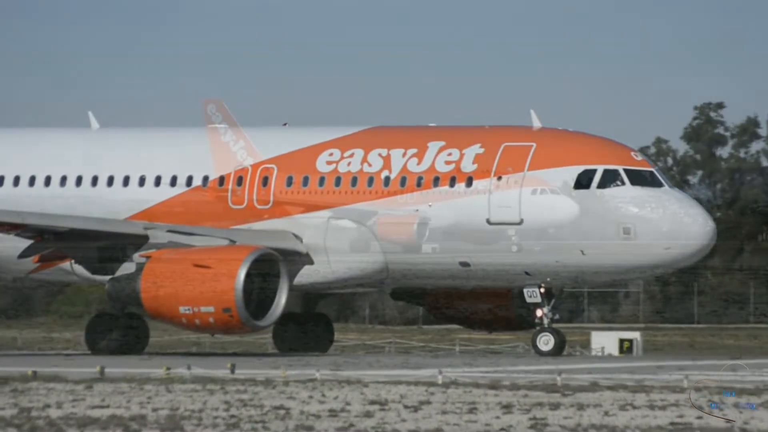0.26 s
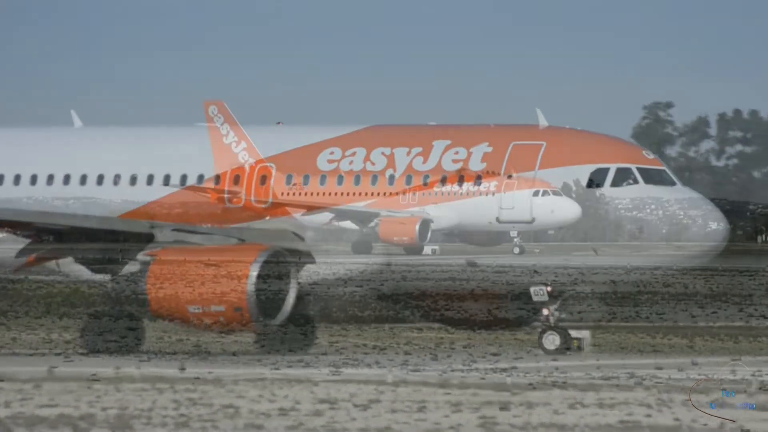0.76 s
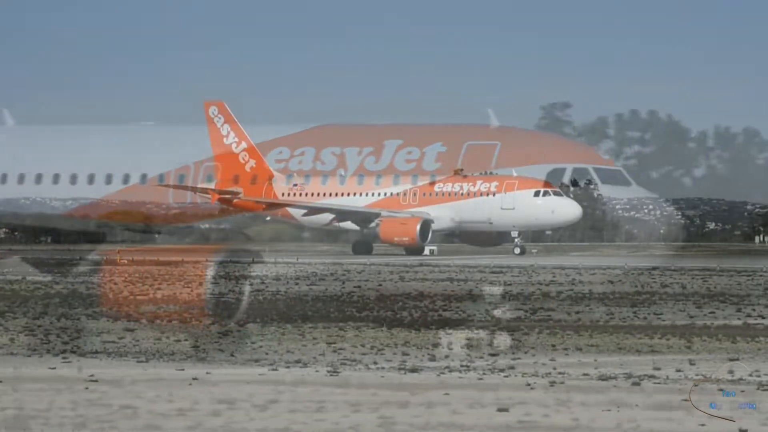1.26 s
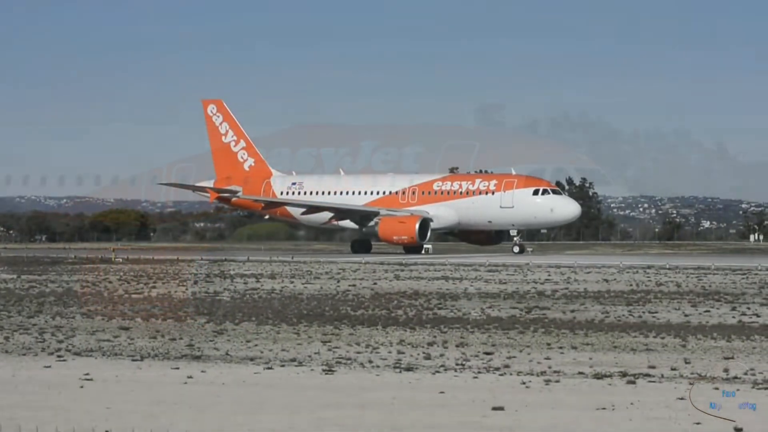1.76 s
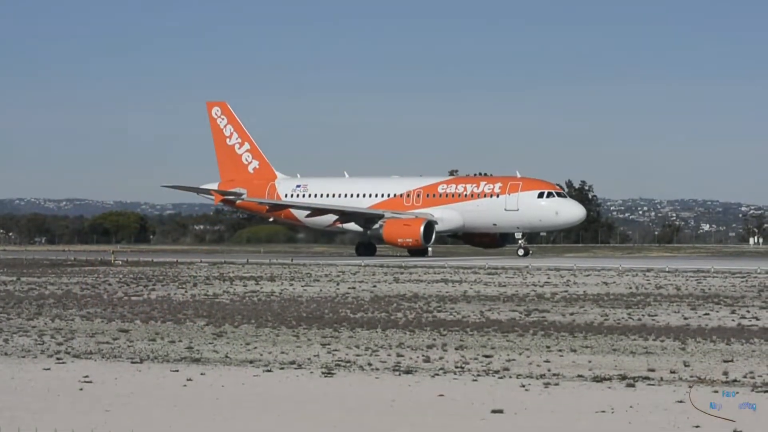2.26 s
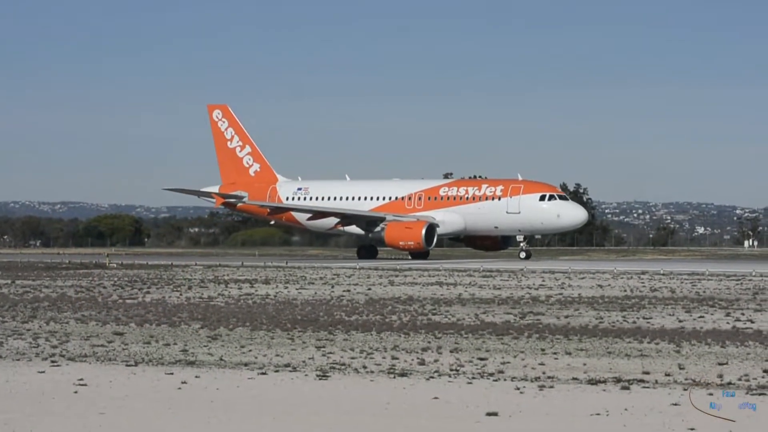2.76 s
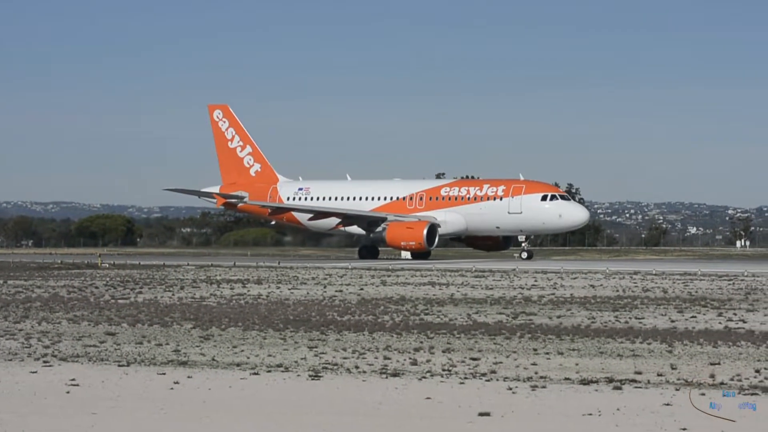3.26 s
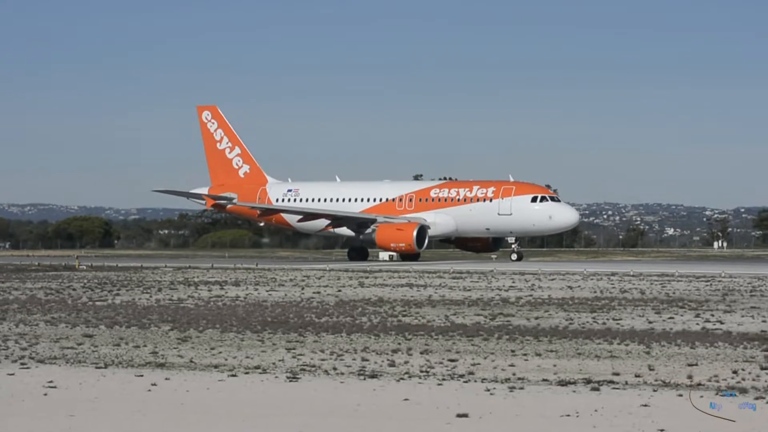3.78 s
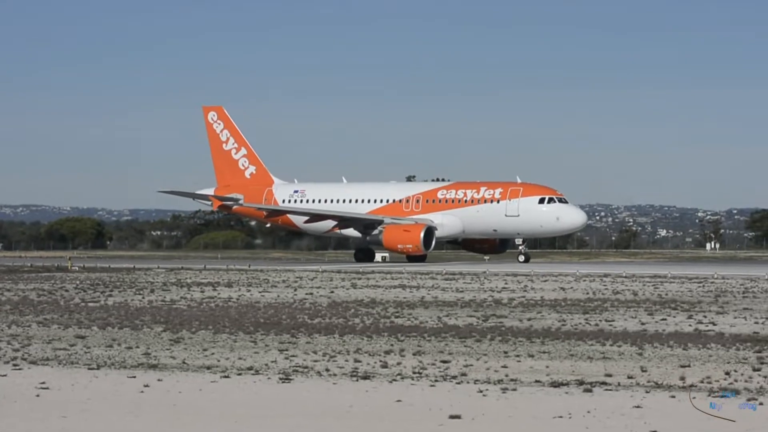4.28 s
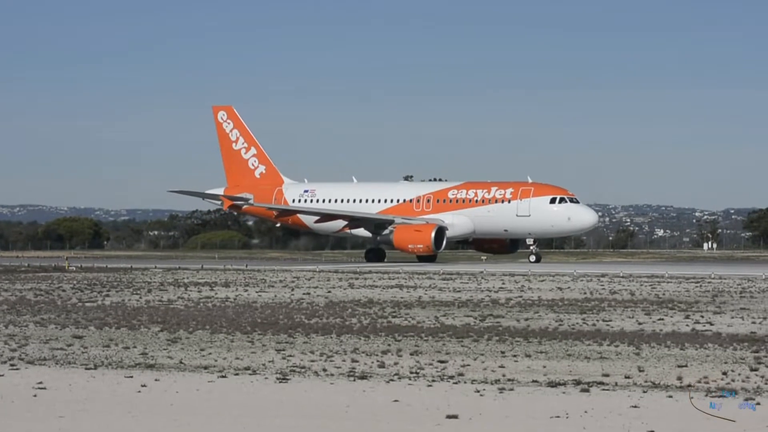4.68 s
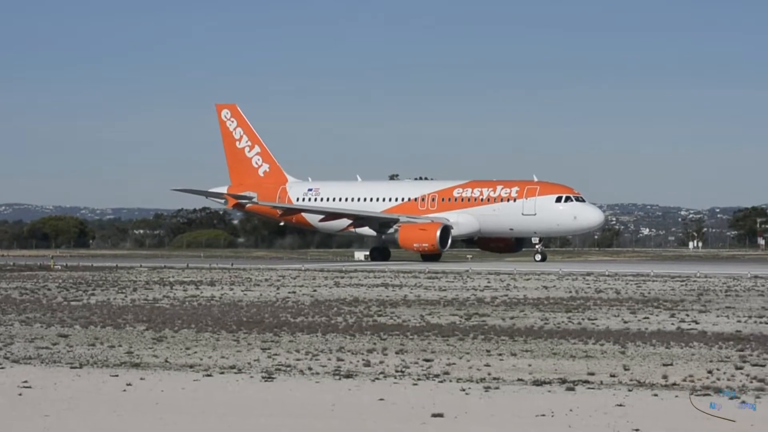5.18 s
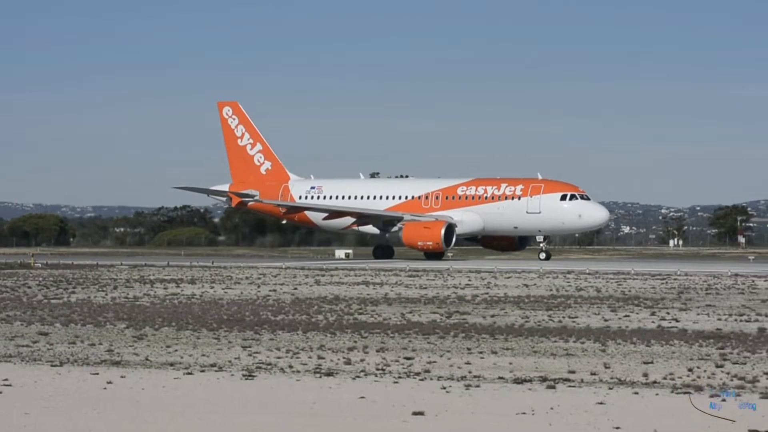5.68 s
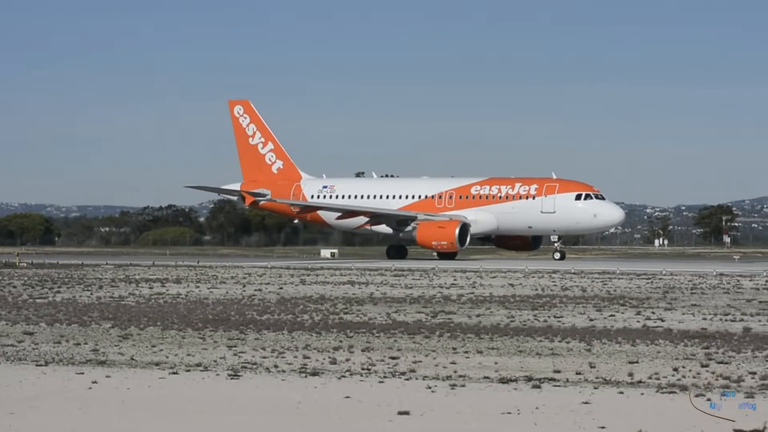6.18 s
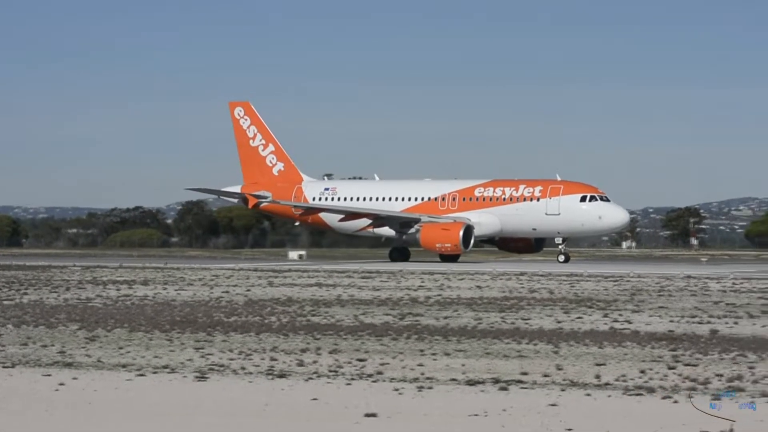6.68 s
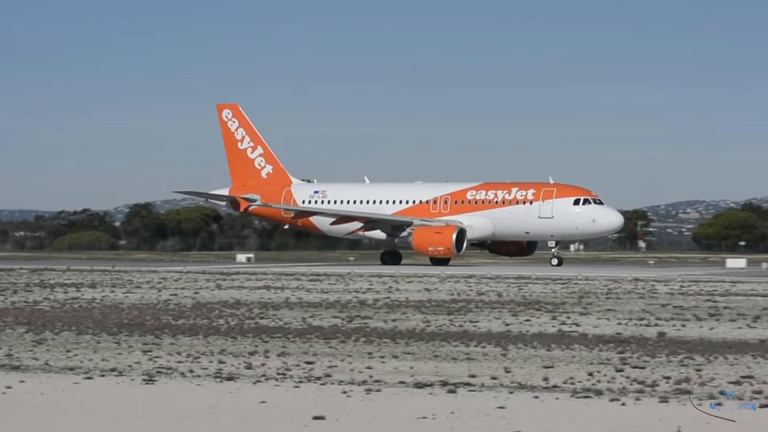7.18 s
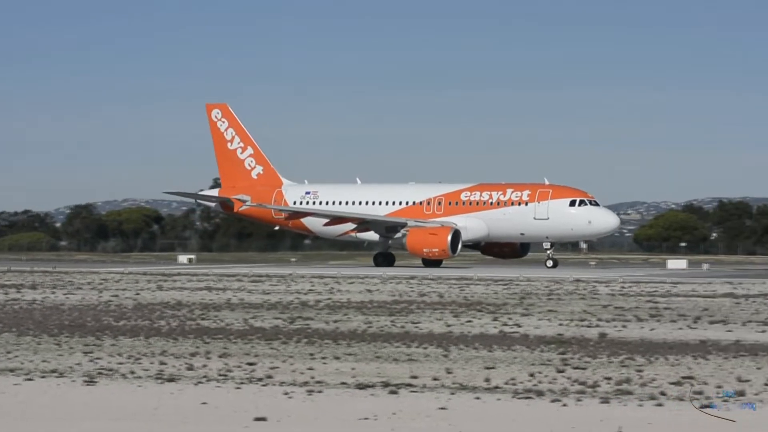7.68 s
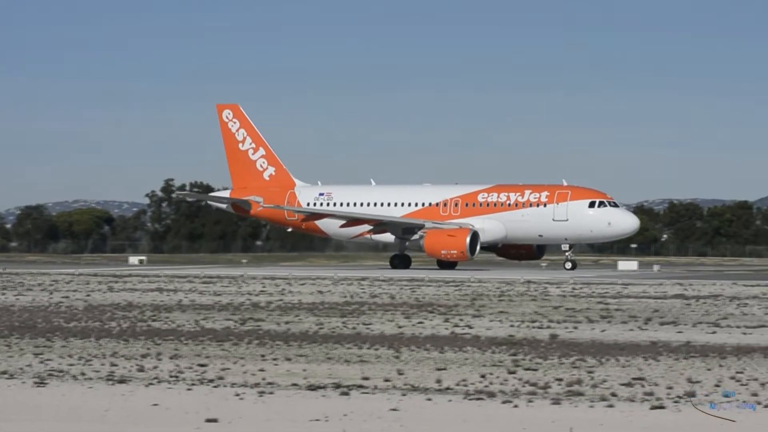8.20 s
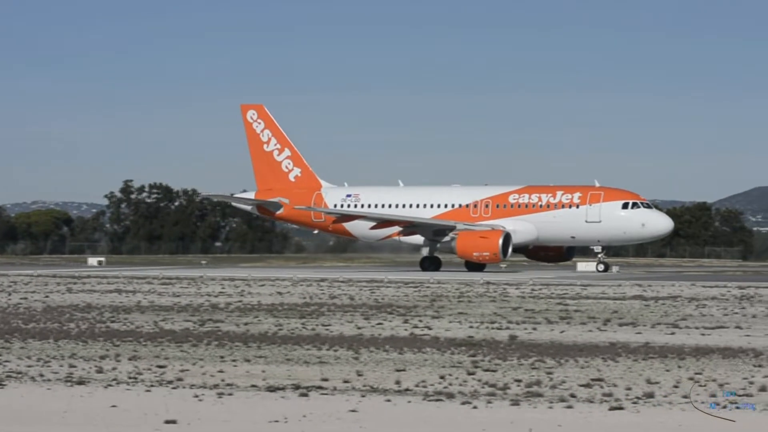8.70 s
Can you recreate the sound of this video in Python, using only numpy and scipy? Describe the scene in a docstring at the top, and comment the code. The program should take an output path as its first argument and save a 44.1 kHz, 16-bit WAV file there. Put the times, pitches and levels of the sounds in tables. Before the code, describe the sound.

Jet engines whine, rise in pitch, pause, then climb to a buzzing take-off roar as wind gusts rumble.

```python
"""On a runway, a twin-engined airliner spools up to half thrust, then to take-off thrust, and starts to roll.
Fan and compressor tones are multiples of shaft speed; they climb with it and flutter in the turbulent air.
Intake hiss and exhaust roar swell underneath, the combustors drone, and wind rumbles on the microphone.
Past half thrust a hollow howl stands out, and near full speed the supersonic fan tips add a buzz."""
import sys
import numpy as np
from scipy import signal
from scipy.fft import rfft, irfft, next_fast_len
from scipy.io import wavfile
from scipy.ndimage import uniform_filter1d

SR = 44100
rng = np.random.default_rng(int(sys.argv[2]) if len(sys.argv) > 2 else 0)


def digitize_waveform(pressure):
    """Quantize a signal to 16-bit integers and store it at the path in sys.argv[1].

    Rows of a 2-D input are taken as channels; values are limited to [-1, 1].
    """
    field = np.atleast_2d(pressure).T
    bounded = np.clip(field, -1, 1)
    quanta = np.round(bounded * 32767).astype(np.int16)
    wavfile.write(sys.argv[1], SR, quanta)


N = 394254
TIME = np.arange(N) / SR
ROLL_START_S, ROLL_DB_PER_S = 6.5, 2.5
# directivity: heard more from the side as the aircraft rolls, the rumble and the fan's octave grow
ROLL_DB = ROLL_DB_PER_S * np.maximum(TIME - ROLL_START_S, 0)


def from_db(db):
    """Amplitude grows tenfold for every 20 dB."""
    return 10 ** (np.asarray(db) / 20)


def rms_one(x):
    """Normalisation to unit power."""
    return x / np.sqrt(np.mean(np.abs(x) ** 2) + 1e-20)


def curve(points, x):
    """Linear interpolation of a two-column table at x."""
    return np.interp(x, *np.transpose(points))


def swells(rows):
    """Raised-cosine bumps in dB, with widths taken at half height."""
    return sum(db * (.5 + .5 * np.cos(np.pi * np.clip((TIME - centre_s) / width_s, -1, 1)))
               for centre_s, width_s, db in rows)


def follow(leader_db, mean_db, share):
    """Coupled levels: one swings about its mean by a share of the other's swing."""
    return mean_db + share * (leader_db - leader_db.mean())


def noise(spectrum):
    """Spectral shaping: white noise takes the given colour, with nothing beyond its ends; rms 1."""
    hz, db = np.transpose(spectrum)
    size = next_fast_len(N)
    log_hz = np.log(np.maximum(np.fft.rfftfreq(size, 1 / SR), 1))
    shape = from_db(np.interp(log_hz, np.log(hz), db, left=-np.inf, right=-np.inf))
    return rms_one(irfft(rfft(rng.standard_normal(size)) * shape, size)[:N])


def blend(idle, takeoff, full):
    """Independent noises add in power, so this crossfade of colours keeps its level."""
    return np.sqrt(1 - full) * noise(idle) + np.sqrt(full) * noise(takeoff)


def drift(rate_hz):
    """Random fluctuation: noise low-passed at rate_hz; rms 1."""
    hop, settle = 40, 2000
    pole = np.exp(-2 * np.pi * hop * rate_hz / SR)
    white = rng.standard_normal(N // hop + settle + 2)
    slow = signal.lfilter([1], [1, -2 * pole, pole * pole], white)[settle:]
    return np.interp(np.arange(N) / hop, np.arange(len(slow)), rms_one(slow))


def tone(cycles, scatter, width_hz):
    """Scattering: turbulent air gives a share of a tone's power a wandering size and phase; rms 1."""
    angle = (2 * np.pi * (cycles % 1)).astype(np.float32)
    in_phase = np.sqrt(2 * (1 - scatter)) + np.sqrt(scatter) * drift(width_hz)
    quadrature = np.sqrt(scatter) * drift(width_hz)
    return in_phase * np.cos(angle) + quadrature * np.sin(angle)


# fan shaft from idle to half thrust, a pause, then take-off thrust: time_s, speed_hz (turns a second)
SHAFT = [(0, 21.95), (1.05, 22.61), (2.16, 26.51), (2.76, 30.44), (3.55, 40.47), (4, 42.88), (5.12, 41.64),
         (5.54, 42.66), (6.01, 48.52), (6.85, 62.45), (7.19, 63.73), (7.84, 64.03), (8.94, 64.86)]
def shaft_speed(inertia_s=.31):
    """Rotational inertia rounds each change of speed."""
    return uniform_filter1d(curve(SHAFT, TIME), size=int(inertia_s * SR), mode="nearest")


# loudness of the intakes: time_s, level_db
INTAKE_LEVEL = [(0.0, -73.5), (0.57, -77), (1.59, -72), (1.89, -65.5), (2.34, -69.5), (3.29, -59.5),
                (3.93, -59.5), (4.33, -64.5), (5.08, -66.5), (6.0, -66), (6.4, -61), (6.87, -59),
                (7.09, -56), (7.92, -52.5), (8.34, -56), (8.94, -54.5)]
# its brief surges: centre_s, width_s, gain_db
INTAKE_SURGES = [(1.9, .25, 1.5), (2.58, 0.11, 1.5), (3.27, .16, 3), (3.75, .15, 2.5), (8.03, 0.22, 1.5)]
def intake_level():
    """Common modulation: fan tones and intake noise follow one envelope, in dB."""
    return curve(INTAKE_LEVEL, TIME) + swells(INTAKE_SURGES)


# shaft speeds from idle to take-off: speed_hz
SPEED_STEPS = [22, 24.5, 29, 35, 42, 53, 64]
# blade-passing tone and its octave: gain_db on the intake level at each speed step
BLADE_TONE = [0.5, -1, 6.5, 1.5, 1, 7, 12]
BLADE_OCTAVE = [-10, -1, 0, -0.5, 1.5, 3, -7.5]
# the tone swells or fades while its octave does the opposite: centre_s, width_s, gain_db
TONE_SWELLS = [(3.05, 0.14, 6.5), (3.35, .12, -1), (3.92, 0.19, -5.5), (4.55, 0.18, 6), (6, 0.13, 4),
               (6.55, 0.3, 7), (6.8, 0.18, -3), (7.1, .35, 2.5), (7.8, 0.15, -2), (8.05, 0.28, 1.5),
               (8.33, 0.2, -7), (8.76, 0.16, -5)]
def fans(speed, turns, full, blades=36):
    """Blade passing: each blade sends out a pressure pulse, so pitch is blade count times shaft speed."""
    intake_db, swell_db = intake_level(), swells(TONE_SWELLS)
    tone_db = intake_db + np.interp(speed, SPEED_STEPS, BLADE_TONE) + swell_db
    octave_db = intake_db + np.interp(speed, SPEED_STEPS, BLADE_OCTAVE) - 0.51 * swell_db + ROLL_DB
    lag = .005 * (1 - full) + .001   # the far engine turns a little slower, least so at full thrust
    near = blades * turns
    far = near - blades * np.cumsum(speed * lag) / SR
    far_gain = from_db(-5 * full)
    fundamental = tone(near, scatter=0.42, width_hz=17.4)
    fundamental += from_db(-3) * far_gain * tone(far, scatter=0.9, width_hz=46)
    octave = tone(2 * near, scatter=0.53, width_hz=18.6)
    octave += far_gain * tone(2 * far, scatter=0.94, width_hz=88)
    fundamental *= from_db(tone_db - 1.5 + 1.9 * drift(20))
    octave *= from_db(octave_db - 3 + 2.1 * drift(10))
    return fundamental + octave


# broad skirt around each tone: speed_hz, gain_db
SMEAR = [(22, -5), (35, 1), (42, -15.5), (64, -12)]
def overtones(table, speed, turns, scatter, width_hz):
    """Spectral broadening: a slow fan chops the eddies it sucks in, which smears its tones."""
    smear = from_db(curve(SMEAR, speed))
    out = 0
    for multiple, *levels_db in table:
        cycles = round(multiple) * turns
        line = tone(cycles, scatter, width_hz) * from_db(2 * drift(11) - 2.5)
        skirt = smear * tone(cycles, scatter=0.91, width_hz=130)
        out = out + from_db(np.interp(speed, SPEED_STEPS, levels_db)) * (line + skirt)
    return out


# higher fan tones and booster tones: shaft_multiple (rounded in use), gain_db at each speed step
FAN_OVERTONES = [(106.9, -2, -2, -2.5, -3.5, -9, -7, -22.5), (144.6, -5, -9, -10, -10, -15.5, -29, -46.5)]
BOOSTER_TONES = [(91.9, -21, -16, -22, -18, -6, -32, -33), (100.5, -27, -11, -16, -4.5, -13, -13, -23),
                 (130, -10, -16, -16, -15, -11, -29, -43), (137.2, -5, 1.5, -9, -8.5, -14, -22, -36.5),
                 (142, -16, 2.5, -10, -6, -19, -45, -47), (159, -18, -16, -7, -16, -24.5, -43, -55)]
# core compressor whine, strongest just above idle: speed_hz, level_db
CORE_WHINE = [(22, -97), (22.7, -86), (25, -83), (27, -93), (35, -110)]
def whines(speed, turns, core_multiple=228.5):
    """Rotor tones scale with shaft speed: fan and booster stages, and the core compressor above them."""
    fan = overtones(FAN_OVERTONES, speed, turns, scatter=0.99, width_hz=45)
    booster = overtones(BOOSTER_TONES, speed, turns, scatter=.8, width_hz=18)
    core_db = curve(CORE_WHINE, speed) + 3 * drift(4)
    core = from_db(core_db) * tone(core_multiple * turns, scatter=.95, width_hz=45)
    return from_db(intake_level() + 0.35) * (fan + booster) + core


# loudness of the exhaust roar: time_s, level_db
ROAR_LEVEL = [(0.0, -65), (0.05, -63), (0.67, -64.5), (1.82, -54.5), (2.31, -53), (3.39, -46),
              (4.68, -58.5), (5.2, -58), (5.52, -55), (6.03, -56.5), (6.45, -51), (6.72, -52),
              (7.32, -45.5), (8.94, -45.5)]
# exhaust spectra at idle and at full thrust: frequency_hz, relative_db
RUMBLE_IDLE = [(60, -17), (115, 6), (150, 1.5), (195, -2), (240, -6), (320, -11.5), (500, -16.5)]
RUMBLE_FULL = [(35, -3.5), (70, 7.5), (105, 4), (140, 6), (180, 0), (270, 0.5), (340, -15), (500, -31)]
ROAR_IDLE = [(200, -21.5), (330, -9), (450, -0.5), (600, -0.5), (720, -1), (830, 3.5), (950, -3),
             (1150, -5.5), (1400, -11.5), (2000, -32), (3000, -49)]
ROAR_FULL = [(200, -9), (330, 4.5), (450, 3), (600, 1), (720, 0.5), (830, 4), (950, 0), (1150, -2),
             (1400, -13.5), (2000, -19), (3000, -52.5)]
def exhaust(speed, full, thrust_db=9, spool_up_db=4):
    """Turbulent mixing of the jets with still air: a rumble that broadens with thrust, and a roar."""
    spool_up = np.maximum(np.gradient(speed, TIME), 0) / 16.6   # about 1 at the steepest climb
    roar_db = curve(ROAR_LEVEL, TIME)
    rumble_db = follow(roar_db, mean_db=-53.5, share=0.44) + thrust_db * full + ROLL_DB
    rumble_db += spool_up_db * spool_up   # extra fuel burns while the shaft speeds up
    rumble = from_db(rumble_db) * blend(RUMBLE_IDLE, RUMBLE_FULL, full)
    roar = from_db(roar_db + 0.68 + 0.97 * drift(4.2)) * blend(ROAR_IDLE, ROAR_FULL, full)
    return rumble + roar


# intake noise spectra, low band to high: frequency_hz, relative_db
RUSH = [(800, -14.5), (1250, -2.5), (1550, 0.5), (2000, 3), (2400, -0.5), (2700, -8.5), (3400, -20.5),
        (4500, -43.5)]
RASP = [(1900, -25.5), (2350, -5), (2700, 0.5), (3100, 0), (3500, 1.5), (3900, -4.5), (4300, -14),
        (5000, -22.5), (6500, -50)]
HISS_IDLE = [(3400, -22), (4200, -0.5), (4700, 2), (5500, -1.5), (6000, -8.5), (6500, -18), (7200, -19.5),
             (8300, -26.5), (10000, -36)]
HISS_FULL = [(3400, -23), (4200, 2), (4700, -0.5), (5500, -3), (6200, -9), (7000, -18), (8300, -24),
             (10000, -36.5), (12000, -50)]
def intake(full):
    """Flow noise: air tears over the blades, and the breeze along the path makes the sound flutter."""
    hiss_db = intake_level()
    rush_db = follow(hiss_db, mean_db=-61, share=0.66) + 7 * full + 0.32 * swells(TONE_SWELLS)
    rasp_db = follow(hiss_db, mean_db=-60, share=0.73) + 3 * full ** 4
    rush = from_db(rush_db + 0.28 * drift(4.3)) * noise(RUSH)
    rasp = from_db(rasp_db + 0.56 * drift(5)) * noise(RASP)
    hiss = from_db(hiss_db - 1.8 + .5 * drift(14)) * blend(HISS_IDLE, HISS_FULL, full)
    flutter = from_db(1.26 * drift(1.2))
    return flutter * (rush + rasp + hiss)


# low drone, weakest at full thrust: speed_hz, level_db
DRONE_LEVEL = [(22.2, -50), (22.6, -54.5), (25.5, -50.5), (37, -54), (42, -61), (48, -53.5), (63, -68.5)]
def combustor_drone(speed, idle_hz=143.8, top_hz=185.4):
    """Resonance: a narrow band of turbulence that rises to its top pitch just above idle."""
    idle_speed_hz, rise_speed_hz = 22, 1.4
    pitch_hz = top_hz - (top_hz - idle_hz) * np.exp((idle_speed_hz - speed) / rise_speed_hz)
    band = tone(np.cumsum(pitch_hz) / SR, scatter=0.96, width_hz=11.2)
    return from_db(curve(DRONE_LEVEL, speed)) * band


# spectrum of the buffeting: frequency_hz, relative_db
WIND_SPECTRUM = [(10, -15), (25, -1), (45, 0.5), (75, 1), (115, -2), (150, -7), (200, -16.5), (280, -21),
                 (500, -43.5), (1000, -65.5)]
# one lull and the gusts: centre_s, width_s, gain_db
LULL = [(.4, 0.42, -12)]
GUSTS = [(1.35, 0.33, 3.5), (2.15, 0.36, 4), (2.46, 0.21, 15.5), (2.66, 0.082, 13.5), (4.3, 0.25, 6),
         (5.46, 0.23, 5), (5.73, 0.14, 3.5), (6.5, 0.17, 6), (7.22, 0.12, 6.5), (8.69, 0.16, 11)]
def wind(breeze_db=-46.2, rise_db_per_s=0.42):
    """Turbulent pressure: eddies in a slowly freshening breeze buffet the microphone."""
    level_db = breeze_db + rise_db_per_s * TIME + swells(LULL) + swells(GUSTS)
    return from_db(level_db + 0.71 * drift(5.4)) * noise(WIND_SPECTRUM)


# hollow howl, strongest between half and full thrust: speed_hz, level_db
HOWL_LEVEL = [(32, -77), (42, -65.5), (50, -59), (58, -59), (63, -69)]
def combustor_howl(speed, full, half_hz=392.7, full_hz=430.4):
    """Resonance: a higher, wider band of turbulence whose pitch rises with thrust."""
    pitch_hz = half_hz + (full_hz - half_hz) * full
    band = tone(np.cumsum(pitch_hz) / SR, scatter=0.96, width_hz=47)
    return from_db(curve(HOWL_LEVEL, speed)) * band


# harmonics of the shock pattern: shaft_multiple, level_db before the onset gain
BUZZ_HARMONICS = [(11, -57), (13, -56), (14, -52.5), (16, -57), (17, -55.5), (18, -56), (19, -54),
                  (20, -57), (21, -55), (22, -64), (23, -56), (25, -61), (29, -59.5), (30, -66),
                  (31, -59.5), (38, -60.5), (45, -58), (47, -58), (50, -68), (52, -65.5), (53, -59.5),
                  (55, -60.5), (56, -61.5)]
# onset as the blade tips pass the speed of sound: speed_hz, gain_db
BUZZ_ONSET = [(57, -40), (62.8, -7), (64, -6), (64.5, -2.5)]
def tip_buzz(speed, turns):
    """Shock waves: each supersonic tip sheds a slightly different one, so they repeat once a turn."""
    shocks = sum(from_db(db) * tone(multiple * turns, scatter=0.81, width_hz=3.7)
                 for multiple, db in BUZZ_HARMONICS)
    return from_db(curve(BUZZ_ONSET, speed)) * shocks


def scene():
    """Superposition of engines and wind; shaft speed sets the engines' pitches and noise colour."""
    speed = shaft_speed()
    turns = np.cumsum(speed) / SR
    full = np.interp(speed, [42, 63], [0, 1])   # 0 up to half thrust, 1 at take-off thrust
    tones = fans(speed, turns, full) + whines(speed, turns) + tip_buzz(speed, turns)
    jets = exhaust(speed, full)
    combustors = combustor_drone(speed) + combustor_howl(speed, full)
    return (tones + jets + combustors + intake(full) + wind())[None]


def record(dry):
    """Electronic self-noise adds faint hiss and a thin whistle; the ends are eased and the top is cut."""
    whistle_hz, cutoff_hz = 15682, 15740
    hiss = from_db(-82) * rng.standard_normal(N)
    whistle = from_db(-91) * np.sqrt(2) * np.sin(2 * np.pi * whistle_hz * TIME)
    ease = np.minimum(np.minimum(TIME, TIME[::-1]) / .003, 1)
    lowpass = signal.ellip(14, .1, 70, cutoff_hz, fs=SR, output="sos")
    return signal.sosfilt(lowpass, ease * (dry + hiss + whistle))


dry = scene()
out = record(dry)
digitize_waveform(out)
```